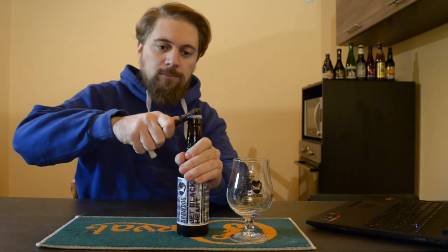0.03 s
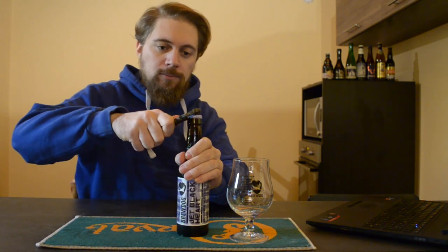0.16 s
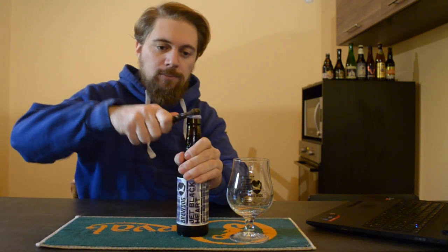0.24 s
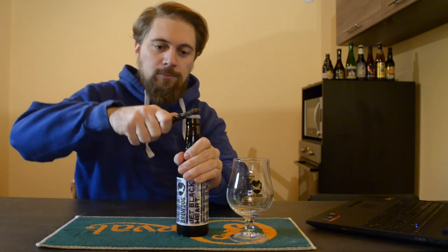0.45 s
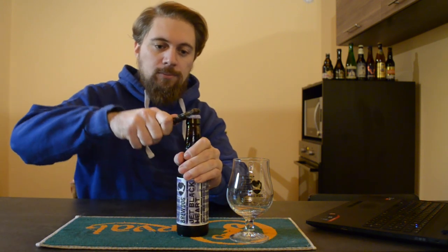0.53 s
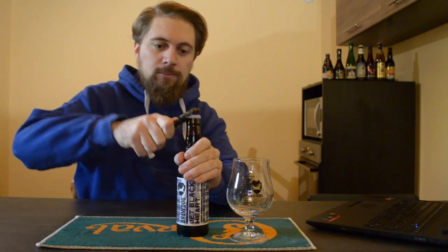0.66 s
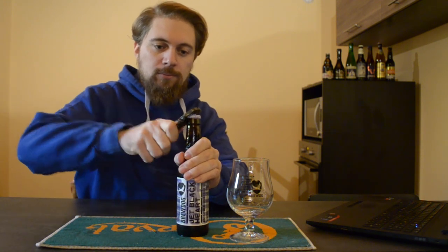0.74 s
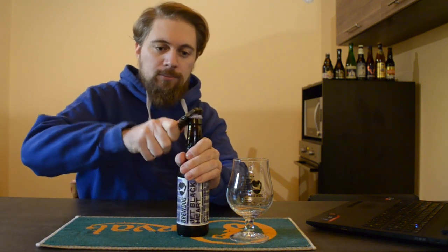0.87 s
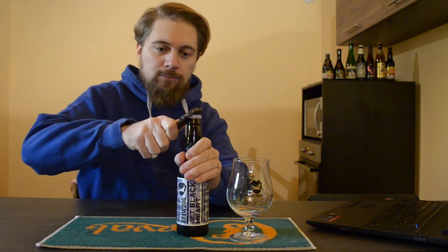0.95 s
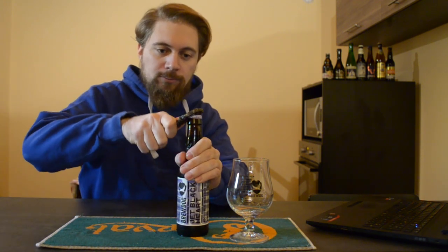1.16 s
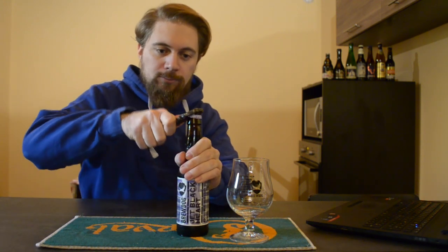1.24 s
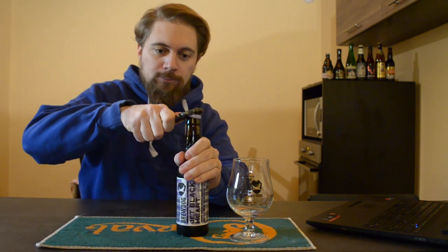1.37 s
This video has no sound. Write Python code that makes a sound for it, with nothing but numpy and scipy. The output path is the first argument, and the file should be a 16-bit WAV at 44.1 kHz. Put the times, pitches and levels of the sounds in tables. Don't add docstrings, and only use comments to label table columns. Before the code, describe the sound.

Bottle opener clacking on a glass bottle's cap. Quiet room air and faint low hum, then a brief scrape and ticks lead into a hard, bright, clipped clack at 0.24 s, ringing through a bare kitchen. The bottle settles softly at 0.5 s. Ticks from 0.7 s lead into a duller, longer clack at 0.78 s with a table thump. Soft set-down knocks near 1.3 s.

```python
import sys
import numpy as np
from scipy import signal
from scipy.fft import rfft, irfft
from scipy.io import wavfile

SR = 44100
rng = np.random.default_rng(int(sys.argv[2]) if len(sys.argv) > 2 else 0)


def pcm_store(signal):
    levels = np.round(np.clip(np.atleast_2d(signal), -1, 1) * 32767)
    wavfile.write(sys.argv[1], SR, levels.astype(np.int16).T)


def ratio_of_db(decibels):
    return 10 ** (np.asarray(decibels, float) / 20)


N = 61739


def evened(x):
    return x / np.sqrt(np.mean(x ** 2) + 1e-20)


def read(points, hz):
    f, value = np.transpose(points)
    return np.interp(np.log(hz + 1), np.log(f + 1), value)


def add(mix, s, sound):
    part = mix[round(s * SR):][:len(sound)]
    part += sound[:len(part)]


def band(x, lo_hz, hi_hz, order):
    hi_hz = min(hi_hz, SR * 0.45)
    return signal.sosfilt(signal.butter(order, [lo_hz, hi_hz], "band", fs=SR, output="sos"), x)


def swell(sound, rise_s):
    t = np.arange(len(sound)) / SR
    return sound * np.sin(np.pi / 2 * np.minimum(t / rise_s, 1)) ** 2


def ring(hz, db, t60, length=SR // 6):
    t = np.arange(length) / SR
    return ratio_of_db(db - 60 * t / max(t60, 0.002)) * np.sin(2 * np.pi * hz * t)


def crack(db, top_hz):
    low_hz, t60, rise_s = 654, 0.009, 0.00015
    t = np.arange(SR // 6) / SR
    noise = evened(band(rng.standard_normal(len(t)), low_hz, top_hz, order=4))
    return ratio_of_db(db - 60 * t / t60) * noise * np.minimum(t / rise_s, 1)


def air():
    # frequency in Hz, level in dB
    floor_colour = [(25, -25.5), (70, -9.5), (200, -2.5), (500, -8), (1200, -16.5), (3200, -25.5),
                    (5500, -35.5), (16000, -40)]
    # frequency in Hz, line width in Hz, level in dB
    drone = [(60.3, 14, -57.5), (108.8, 48, -59), (220, 30, -65)]
    floor_db = -52.5
    hz = np.fft.rfftfreq(N, 1 / SR)
    floor = irfft(rfft(rng.standard_normal(N)) * ratio_of_db(read(floor_colour, hz)), N)
    x = ratio_of_db(floor_db) * evened(floor)
    for f, width, db in drone:
        resonance = 1 / (1 + (2 * (hz - f) / width) ** 2)
        x = x + ratio_of_db(db) * evened(irfft(rfft(rng.standard_normal(N)) * resonance, N))
    return x


def knocks():
    # start in seconds, level in dB
    blows = [
        (0.223, -28.5),
        (.2310, -22.5),
        (0.492, -26.5),
        (0.718, -32),
        (0.751, -32),
        (0.769, -32),
        (.7910, -17),
        (.8850, -31.5),
        (1.2798, -28),
        (1.309, -35.5),
    ]
    # frequency in Hz, level in dB, t60 in seconds
    table_modes = [(218.8, 4.5, 0.083), (299, -8, 0.25), (390, -1.5, 0.068), (507.4, -8, 0.1),
                   (843, -8, .05), (1500, -19, .02)]
    room_db, rise_s = -7.5, 0.0024
    x = np.zeros(N)
    shares = rng.uniform(-1.3, 1, (len(blows), len(table_modes)))
    for (s, db), share in zip(blows, shares):
        body = sum(ring(hz * (1 + 0.047 * u), mode_db + 2.8 * u, t60)
                   for (hz, mode_db, t60), u in zip(table_modes, share))
        rise = np.minimum(np.arange(len(body)) / SR / rise_s, 1)
        add(x, s, ratio_of_db(db) * body * rise)
    return x * ratio_of_db(np.array([[0], [room_db]]))


def scrapes():
    # start in seconds, end in seconds, level in dB, top frequency in Hz
    strokes = [
        (0.223, 0.247, -36.5, 4540),
        (0.701, 0.793, -52.5, 4000),
        (1.283, 1.355, -60, 2200),
    ]
    low_hz, spread_db, slips_per_s = 600, 2, 4000
    t = np.arange(N) / SR
    slipping = rng.random(N) < slips_per_s / SR
    size = ratio_of_db(spread_db * np.minimum(rng.exponential(1, N), 4)) * rng.choice([-1., 1.], N)
    x = np.zeros(N)
    for start, end, db, top_hz in strokes:
        grit = band(size * slipping * (t > start) * (t < end), low_hz, top_hz, order=5)
        share = np.sqrt((end - start) * SR / N)
        x = x + ratio_of_db(db) * share * evened(grit)
    return x


def ticks():
    # start in seconds, level in dB, ring frequency in Hz, t60 in seconds, crack top in Hz
    contacts = [(.2236, -56, 3000, .015, 4860), (.2270, -20.5, 3200, 0.021, 12000),
                (0.2285, -21, 8800, 0.0064, 12000), (0.2393, -45, 3100, .02, 6000),
                (.7090, -45.5, 3200, .02, 4000), (0.7167, -28, 4200, 0.0099, 4000),
                (.7520, -33.5, 3000, 0.077, 3790), (.7700, -30, 3500, 0.034, 6000),
                (.7760, -21.5, 3000, 0.02, 1500), (0.7833, -6, 2900, 0.036, 4500),
                (.7932, -4, 2200, 0.029, 2640), (1.2810, -42.5, 1500, 0.012, 2044),
                (1.307, -52.5, 2500, .01, 3000)]
    crack_db, room_db = -3.5, -7
    x = np.zeros(N)
    for s, db, hz, t60, top_hz in contacts:
        tone = band(ring(hz, db, t60), 200, 0.96 * hz, order=2)
        add(x, s, tone + crack(db + crack_db, top_hz))
    return (x + scrapes()) * ratio_of_db(np.array([[0], [room_db]]))


def standing_waves():
    # frequency in Hz, level in dB, t60 in seconds
    room_modes = [(117.8, -28.5, .7), (150.3, -22, 0.33)]
    return swell(sum(ring(hz, db, t60, SR // 2) for hz, db, t60 in room_modes), 0.012)


def clack(modes, s, contact_s, crack_db, crack_top_hz, room_db, far_top_hz):
    far_ring = 0.84
    far_rise_s, far_crack_db, far_leak_db = 0.0007, -3.5, -14
    out = np.zeros((2, N))
    snap = crack(crack_db, crack_top_hz)
    near_rings = sum(ring(hz, near_db, t60) for hz, near_db, t60, _ in modes)
    add(out[0], s, swell(snap + near_rings, contact_s))
    add(out[0], s, standing_waves())
    far_rings = sum(ring(hz, far_db, far_ring * t60) for hz, _, t60, far_db in modes)
    far_snap = ratio_of_db(far_crack_db) * snap
    dulled = band(far_snap, 40, far_top_hz, order=5)
    far = swell(far_rings, far_rise_s) + dulled + ratio_of_db(far_leak_db) * far_snap
    add(out[1], s, ratio_of_db(room_db) * far)
    return out


def slip_clack():
    # frequency in Hz, direct level in dB, t60 in seconds, level sent to the room in dB
    slip_modes = [(192.6, -28.5, 0.024, -7), (368, -21.5, 0.026, -6.5), (500, -23.5, 0.022, -9.5),
                  (1020, -15, 0.057, -10.5), (1714, 10, 0.014, 8), (1970, -5, 0.024, -6),
                  (3000, -8, 0.042, -5), (3401, -4.5, 0.025, 6), (4000, -8, .015, -29.5),
                  (4718, -5.5, 0.014, -5), (5160, -24, 0.018, -5), (7600, -30, 0.013, -19),
                  (9140, -32.5, 0.021, -31), (12000, -24.5, .01, -39.5)]
    return clack(slip_modes, 0.2434, contact_s=0.0001, crack_db=-9.5, crack_top_hz=14998.5,
                 room_db=-3.5, far_top_hz=15795.5)


def prise_clack():
    # frequency in Hz, direct level in dB, t60 in seconds, level sent to the room in dB
    prise_modes = [(239, -9, 0.062, -25), (685, -11, 0.035, -5.5), (854, -11.5, 0.049, -8.5),
                   (1412, -44, 0.019, -4.5), (2257, -7.5, 0.014, 5), (2646, -5.5, 0.022, -4),
                   (3064, -5.5, 0.032, -2.5), (3773, -12.5, 0.037, -10), (4350, -14, 0.015, -8),
                   (5255, -10.5, 0.015, -14.5), (6140, -14, 0.054, -21), (6900, -26.5, 0.026, -26.5),
                   (8170, -29.5, 0.055, -44.5), (9200, -45, 0.03, -35.5)]
    return clack(prise_modes, 0.7799, contact_s=0.0006, crack_db=-17, crack_top_hz=13996,
                 room_db=-6.5, far_top_hz=6697)


def kitchen(x):
    # frequency in Hz, t60 in seconds
    decay = [(100, 0.24), (260, 0.87), (700, 0.52), (1840, 0.62), (4850, 0.57), (8000, 0.53), (12800, 0.33)]
    first_echo_s, build_s = 0.0018, 0.012
    hz, t, z = signal.stft(rng.standard_normal(SR), SR, nperseg=256)
    fading = z * ratio_of_db(-60 * t / read(decay, hz)[:, None])
    tail = signal.istft(fading, SR, nperseg=256)[1]
    tail = tail * np.clip((np.arange(len(tail)) / SR - first_echo_s) / build_s, 0, 1)
    return signal.fftconvolve(x, tail / np.linalg.norm(tail))[:N]


def scene():
    mic_low_hz = 107
    near, far = knocks() + ticks() + slip_clack() + prise_clack()
    thin = signal.butter(4, mic_low_hz, "high", fs=SR, output="sos")
    return (signal.sosfilt(thin, near + kitchen(far)) + air())[None]


def low_pass(x):
    return signal.sosfilt(signal.butter(12, 21850, fs=SR, output="sos"), x)


def record(dry):
    ceiling, edge_hz = 1.0, 16100
    edge = signal.firwin(255, edge_hz, window=("kaiser", 9), fs=SR)[None]
    limited = signal.oaconvolve(np.clip(dry, -ceiling, ceiling), edge, "same")
    return low_pass(np.clip(limited, -ceiling, ceiling))


dry = scene()
out = record(dry)
pcm_store(out)
```